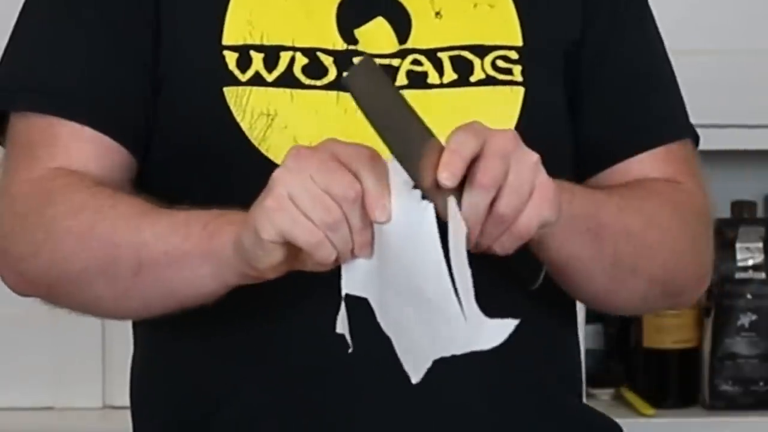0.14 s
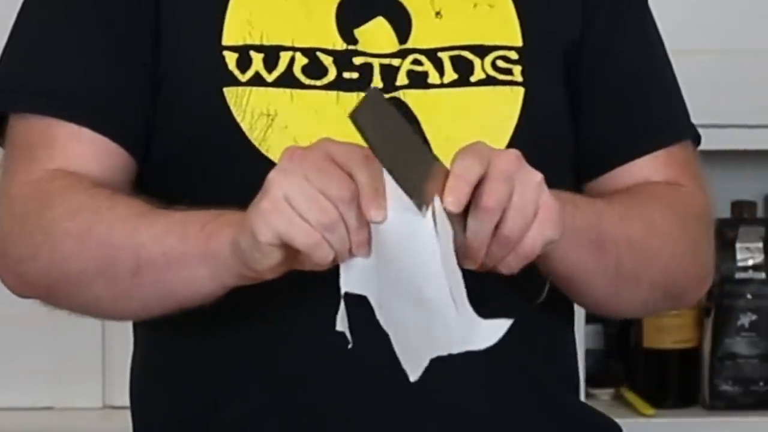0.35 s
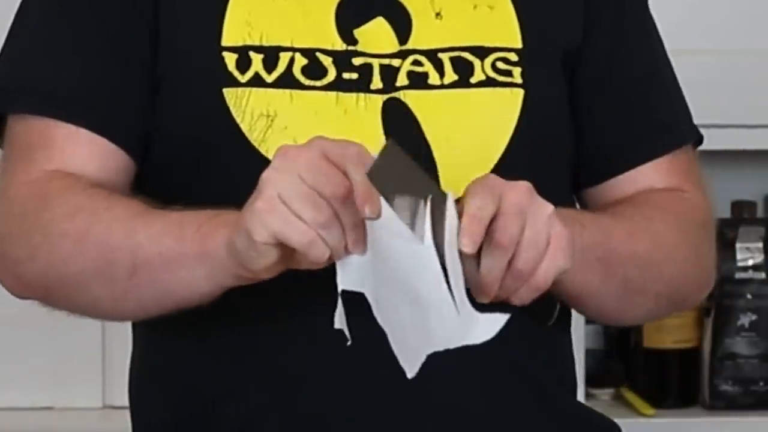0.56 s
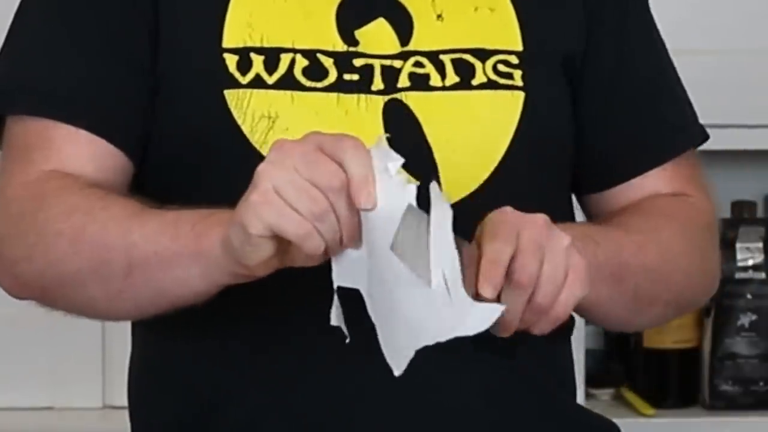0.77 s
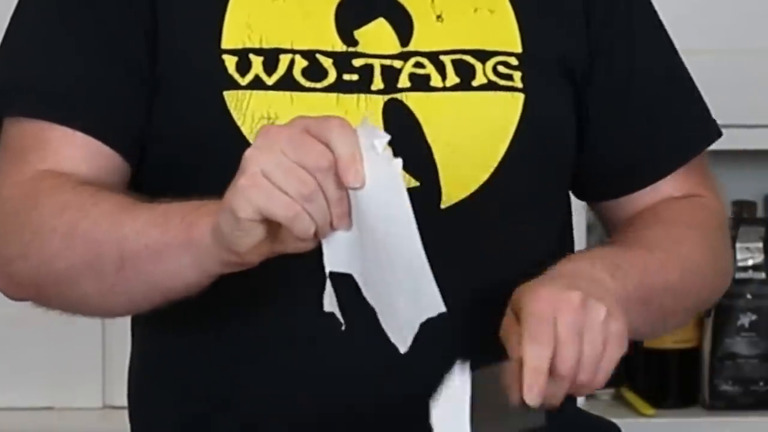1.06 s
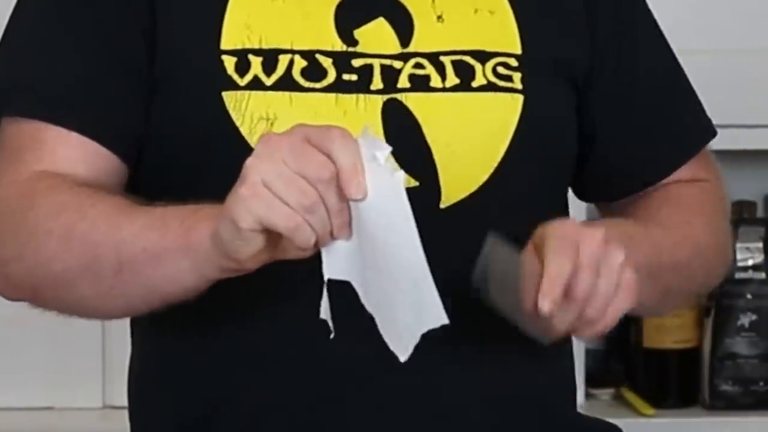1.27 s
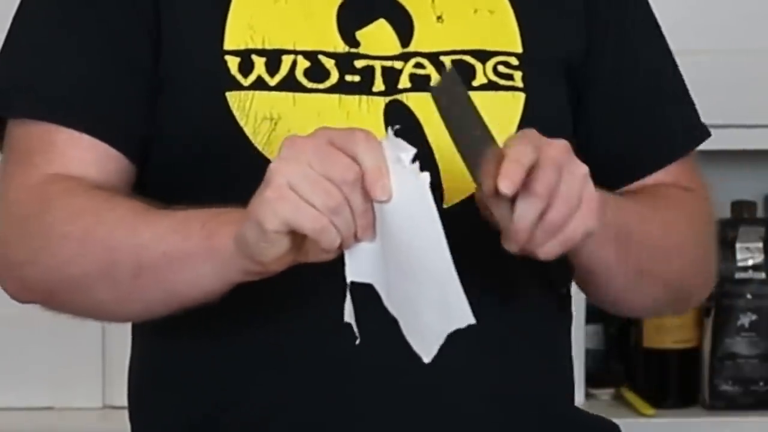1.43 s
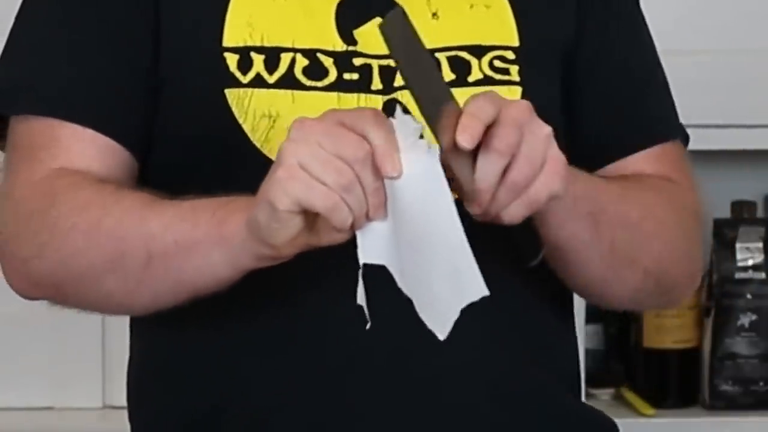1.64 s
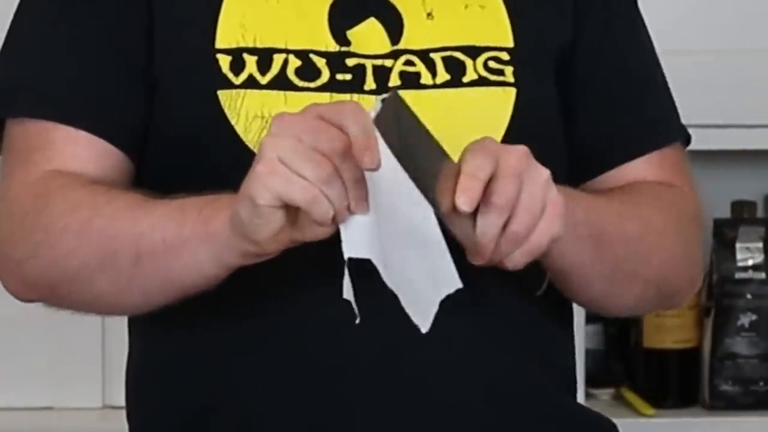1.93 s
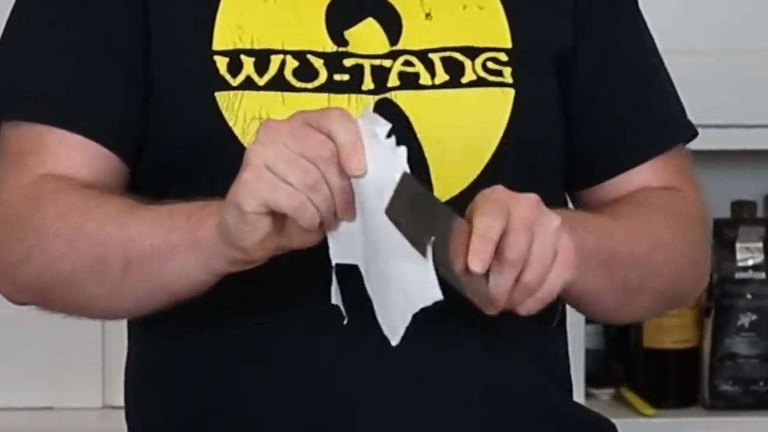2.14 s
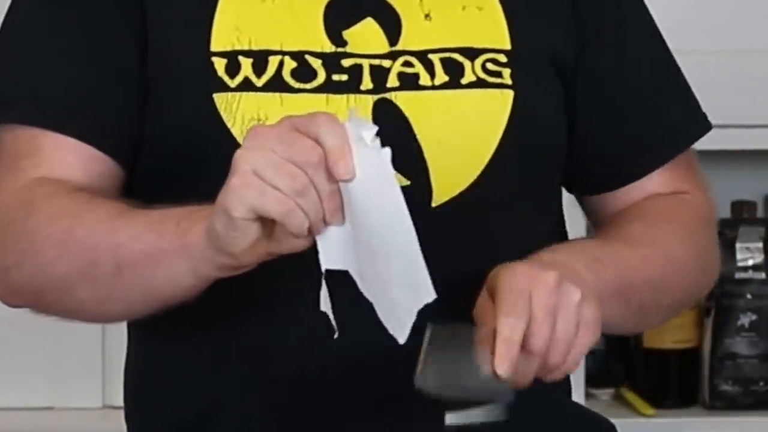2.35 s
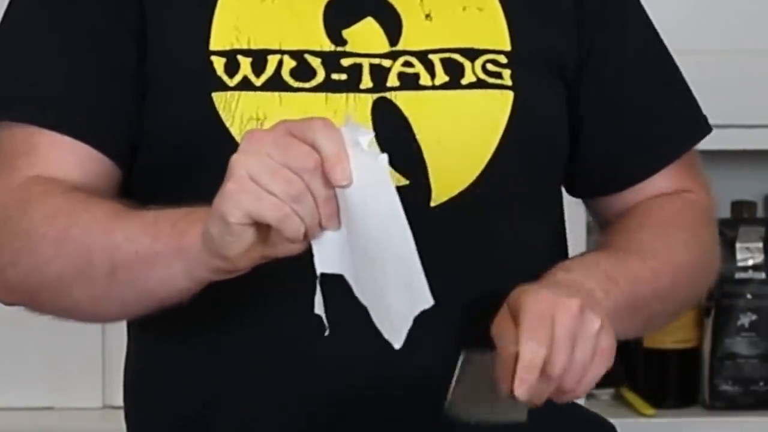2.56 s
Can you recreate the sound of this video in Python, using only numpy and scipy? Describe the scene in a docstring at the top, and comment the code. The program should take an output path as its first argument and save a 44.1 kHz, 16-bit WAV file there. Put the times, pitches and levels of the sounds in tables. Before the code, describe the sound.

A knife slices through a sheet of paper, catching in small snaps before running into a dry rasp. The paper flicks back, and after a pause a second, shorter cut follows. Heard close up in a small kitchen.

```python
"""In a small kitchen, close by, a knife slices twice down through a hand-held sheet of paper.
The edge catches in separate snaps, then runs: fibres break in a dense train of impulses, which the
sheet radiates as a rasp. The paper flicks back after each stroke, the freed blade rings faintly in
its modes, and an arm rustles on its way up again. Hard walls add a short reverberation."""
import sys
import numpy as np
from scipy import signal
from scipy.fft import rfft, irfft
from scipy.io import wavfile
from scipy.ndimage import uniform_filter1d

SR = 44100
rng = np.random.default_rng(int(sys.argv[2]) if len(sys.argv) > 2 else 0)


def store_pcm(level_fs):
    """Save levels as 16-bit WAV."""
    pcm = np.round(np.clip(level_fs, -1, 1) * 32767).astype(np.int16)
    wavfile.write(sys.argv[1], SR, np.atleast_2d(pcm).T)


N = 119070

# frequency response of the sheet (frequency [Hz], level [dB])
SHEET = [(47, -65.5), (80, -23.5), (133, -30), (182, -15.5), (217, -21.5), (283, -16), (338, -8.5),
         (482, -9.5), (643, -3.5), (802, -6), (1120, -1), (1460, -1), (1600, -1), (1900, -4), (2220, -5.5),
         (2660, -2.5), (3620, -5), (4520, -5), (5900, -13.5), (6590, -11), (7360, -16), (8790, -11.5),
         (10700, -24.5), (12800, -24), (16000, -34)]
CONTACT_ATTACK_S, CONTACT_RELEASE_S = 0.006, 0.0074
WANDER_PER_S, TOP_HZ = 16, 15850


def cutting(t, size=131072):
    """Source and filter: breaking fibres drive the sheet, whose resonances wander as it flexes."""
    # each stroke (time [s], level [dB], low mids [dB], treble [dB], main resonance [Hz])
    first_cut = [(0.37, -31, -4, -12, 2800), (0.395, -40.5, 2.5, -0.5, 3030),
                 (0.44, -33.5, -3.5, -4.5, 2840.0), (0.475, -31, -5, -4.5, 2880),
                 (0.505, -28, -5.5, -8.5, 3100), (0.55, -29.5, -3, -12.5, 2680),
                 (0.595, -27.5, -3, -11.5, 2530), (0.615, -30, -1, -10.5, 2640),
                 (0.65, -30, -3.5, -11.5, 2760), (0.75, -35, -1, -6, 2580), (0.79, -30, -1.5, -11, 2440),
                 (0.825, -35.5, 1.5, -6.5, 2640), (0.91, -36.5, 1, -8, 2480), (0.95, -32.5, -1.5, -8, 3020),
                 (0.98, -35.5, -1.5, -3.5, 2830), (1.005, -36.0, -3.5, 2.5, 3400),
                 (1.02, -31, -7, -17, 3270)]
    second_cut = [(1.87, -53.5, 4.5, -9, 2740), (1.9, -47.5, 8, -13.5, 2850), (1.96, -42, 0, -13, 2950),
                  (2.03, -41.5, 3.5, -11.5, 2800), (2.08, -43.5, 5.5, -8.5, 2940.0),
                  (2.14, -36, -5.5, -11, 2750), (2.21, -33.5, -5, -8.5, 2800), (2.25, -31.5, -1, -8, 2940),
                  (2.295, -31.0, -2.5, -7, 2570), (2.335, -28.5, -4, -6, 2570), (2.35, -30.5, 3, -9, 2680)]
    # modes beside the cut (ratio to the main resonance, bandwidth [Hz], gain [dB])
    resonances = [(.53,160,-5.5),(1,320,-2),(1.72,420,-1),(3.2,600,5)]
    # bands of the rasp (lower edge [Hz], upper edge [Hz], gain [dB], low-mid share, treble share)
    registers = [(626,1996,-2,0.84,0.024),(2010,3580,-0.8,0.039,0),(3934,6520,.5,0,0.41),(6670,9940,-0.5,0.26,1.28),(10100,16500,-6.5,0.23,1.42)]
    # bending of the sheet, one curve per movement (time [s], level [dB])
    bending = [
        [(.05,-54),(.09,-54),(.15,-49),(.18,-68)],
        [(.2,-57),(.36,-50.5),(.52,-45.5),(.6,-51),(.7,-48),(.8,-43),(.88,-50),(1.01,-46),(1.09,-59),(1.12,-78)],
        [(1.87,-54.5),(1.93,-45.5),(2.04,-40),(2.12,-48.5),(2.24,-42),(2.28,-54),(2.345,-42),(2.4,-60)],
    ]
    # the edge scrapes without biting (time [s], duration [s], level [dB])
    scrapes = [(0.044, 0.062, -47), (0.125, 0.027, -52), (0.179, 0.035, -56), (0.237, 0.062, -43),
               (0.304, 0.035, -37), (1.041, 0.054, -46), (2.386, 0.087, -55)]
    hz, out = freqs(size), np.zeros(N)
    times, *columns = np.vstack([first_cut, second_cut]).T
    level_db, low_db, treble_db, main_hz = (np.interp(t, times, c) for c in columns)
    drive = shape(fibres(), contour(SHEET, hz))
    rasp = drive.copy()
    for ratio, width, db in resonances:
        mode_hz = ratio * main_hz * (1 + 0.11 * walk(WANDER_PER_S))
        rasp += undb(db) * resonate(drive, mode_hz, width)
    spectrum = rfft(rasp, size)
    register = lambda lo, hi: unit(irfft(spectrum * band(hz, lo, hi) ** 2)[:N])
    in_paper = sum(contact(t, cut[0][0], cut[-1][0]) for cut in (first_cut, second_cut))
    for lo, hi, db, low_share, treble_share in registers:
        band_db = level_db + db + low_share * low_db + treble_share * treble_db
        out += register(lo, hi) * in_paper * undb(band_db)
    bass = register(130, 634)
    for movement in bending:
        out += bass * undb(-3.5 + 3 * walk(per_s=35)) * gesture(t, movement)
    for at, duration, db in scrapes:
        out += unit(rasp) * undb(db) * contact(t, at + CONTACT_ATTACK_S / 2, at + duration)
    return out


def fibres(breaks_per_s=9000, spread_db=1.5, grab_db=1.05):
    """Shot noise: fibres break at random, harder and softer as the edge sticks and slips."""
    breaks = rng.random(N) < breaks_per_s / SR
    strength_db = spread_db * np.minimum(rng.exponential(size=N), 6) + grab_db * walk(per_s=170)
    return breaks * undb(strength_db) * rng.choice([-1, 1], N)


def sizzle(t):
    """Forced resonance: driven by the breaks, narrow modes of the taut paper swell and drop."""
    # (peak time [s], rise [s], fall [s], level [dB], frequency [Hz], bandwidth per stage [Hz])
    sizzles = [(.505,0.055,0.017,-35.5,6280,900),(.66,0.16,0.037,-39,1465,297),(.97,0.09,0.027,-48.5,13000,1800),(2.3,.04,0.024,-41,12100,1300),(2.334,0.042,0.009,-33.5,4980,1000)]
    breaks, out = fibres(), np.zeros(N)
    for at, rise, fall, db, pitch, width in sizzles:
        hz = pitch * (1 + 0.018 * walk(WANDER_PER_S))
        swell = np.exp(-((t - at) / np.where(t < at, rise, fall)) ** 2)
        singing = resonate(resonate(breaks, hz, width), hz, width)
        out += undb(db) * swell * unit(singing)
    return out


def paper_clicks(size=2048):
    """Impulsive excitation: fracture, buckling and impact each radiate a brief transient."""
    # the edge catches and a bundle of fibres snaps (time [s], level [dB], tilt [dB/octave])
    snaps = [(0.0488,-44,2),(.0978,-40.5,-1.5),(0.1361,-40.5,3),(0.1934,-36,-2.5),(0.2078,-32,0.5),(.2303,-35.5,0.5),(0.2414,-42.5,9.5),(0.246,-34.5,9),(.2565,-32.5,-0.5),
             (0.2744,-40.5,7),(0.2795,-30,3),(0.2847,-26.5,2),(.2899,-40,0.5),(0.3064,-26,4.5),(0.31,-36,6.5),(0.3138,-34,7),(0.3181,-22,9.5),(0.3265,-29,7.5),(.329,-22.5,-1.5),
             (0.334,-33,-1),(0.341,-28.5,6),(0.3428,-22,-1),(0.359,-19,2.5),(0.3616,-26.5,2.5),(0.3647,-24.5,1),(.375,-37,1),(1.002,-29.5,-3),(1.177,-43,4.5),(1.365,-50.5,7.5),(2.173,-27.5,-8)]
    # the sheet buckles or flicks back (time [s], level [dB], frequency [Hz], relative air puff [dB])
    flicks = [(.199,-28.5,1940,-9.5),(0.795,-26,1140,-9.5),(1.014,-29.5,2330,-6),(1.082,-28,1770,-10.5),(1.247,-59.5,900,3),(1.754,-59,2000,-8),(2.0124,-27,1830,-13),(2.246,-24,1220,-15),(2.347,-23.5,1020,-13),(2.426,-28,1470,-6.5),(2.4327,-23,2400,-23)]
    # the cut strip lands (time [s], level [dB], frequency [Hz], decay [s])
    ticks = [(1.294,-41,6500,0.0017),(1.3024,-45,7600,0.00069),(1.3039,-38,7000,0.00075),(1.318,-52,5540,.001),(1.324,-42,7000,0.0013),(1.327,-45.5,5130,0.0008)]
    hz, t, out = freqs(size), np.arange(size) / SR, np.zeros(N)
    sheet = contour(SHEET, hz)
    for at, db, tilt in snaps:
        colour = sheet * undb(tilt * np.log2(hz)) * band(hz, 775, TOP_HZ, order=2)
        add(out, at, undb(db) * burst(colour, decay_s=0.0018))
    for at, db, pitch, puff_db in flicks:
        crack = burst(sheet * hump(hz, pitch, octaves=0.53), decay_s=0.0023)
        puff = burst(hump(hz, 356, octaves=1.65) ** 2, decay_s=0.0076)
        add(out, at, undb(db) * (crack + undb(puff_db) * puff))
    for at, db, pitch, decay in ticks:
        envelope = (t / decay) * np.exp(2 - 2 * t / decay)
        ping = envelope * np.sin(2 * np.pi * pitch * t)
        crack = burst(hump(hz, pitch, octaves=0.5), decay)
        add(out, at, undb(db) * (ping + undb(-7.5) * crack))
    return out


def blade(t):
    """Free vibration: the steel rings in damped modes when it leaves the paper."""
    # blade modes (frequency [Hz], level [dB], T60 [s])
    modes = [(2080,-37.5,0.35),(2132,-48.5,0.3),(2970,-44.5,0.43),(4560,-64,0.21),(7600,-56.5,0.66)]
    # the blade comes free (time [s], gain [dB])
    releases = [(1.02,-5),(2.432,-4.5)]
    ring = sum(undb(db) * np.sin(2 * np.pi * hz * t) * undb(-60 * t / t60) for hz, db, t60 in modes)
    out = np.zeros(N)
    for at, db in releases:
        add(out, at, undb(db) * ring)
    return out


def sleeve(t):
    """Friction noise: cloth rustles as the knife arm moves."""
    # spectrum of the rustle (frequency [Hz], level [dB])
    cloth = [(47, -16), (80, -10), (208, -6), (253, -26), (283, -11), (802, -12), (1670, -21),
             (1950, -15.5), (3870, -19), (16000, -32)]
    # one curve per arm movement (time [s], level [dB])
    arm = [
        [(1.15,-60.5),(1.38,-67.5),(1.5,-64),(1.63,-62.5),(1.72,-71),(1.8,-92)],
        [(2.5,-56),(2.62,-73),(2.7,-70)],
    ]
    return coloured_noise(cloth) * undb(walk(per_s=30.2)) * sum(gesture(t, move) for move in arm)


def still_air(level_db=-63.5):
    """Ambient noise: a steady hush, strongest in the bass."""
    # spectrum of the kitchen's air (frequency [Hz], level [dB])
    air = [(15, -29.5), (25, -11.5), (270, -6), (624, -19), (911, -17), (1330, -24), (2690, -26.5),
           (5430, -32), (7710, -32), (8830, -33), (16000, -41)]
    return undb(level_db) * coloured_noise(air)


def kitchen(x, delay_s=0.00506, size=32768):
    """Reverberation: reflections from walls and cupboards form a diffuse, exponential tail."""
    # decay by band (frequency [Hz], T60 [s], level [dB])
    room = [(200,0.22,-6.5),(590,0.47,-6.5),(1420,0.35,-6.5),(3950,0.48,-12),(9000,0.33,-6.5),(15000,0.22,-6)]
    t, hz, noise = np.arange(size) / SR, freqs(size), rfft(rng.standard_normal(size))
    log_centres, tail = np.log([row[0] for row in room]), 0
    for pick, (_, t60, db) in zip(np.eye(len(room)), room):
        reflections = irfft(noise * np.interp(np.log(hz), log_centres, pick))
        fade = undb(-60 * t / t60) * (t > delay_s)
        tail += undb(db) * reflections * fade / np.sqrt(np.sum(fade ** 2))
    return x + signal.fftconvolve(x, tail)[:N]


def contact(t, start, end):
    """Gate with a linear attack and an exponential release."""
    attack = np.clip((t - start) / CONTACT_ATTACK_S + 1, 0, 1)
    return attack * np.exp(-np.maximum(t - end, 0) / CONTACT_RELEASE_S)


def gesture(t, curve):
    """Envelope from a (time [s], level [dB]) curve, fading out beyond its ends."""
    times, db = np.array(curve).T
    return undb(np.interp(t, times, db)) * contact(t, times[0], times[-1])


def burst(gain, decay_s, rise_s=0.0004, size=2048):
    """Damped noise transient with the energy of 2 ms (88 samples) at rms 1."""
    t = np.arange(size) / SR
    envelope = (1 - np.exp(-t / rise_s)) * np.exp(-t / decay_s)
    x = shape(rng.choice([-1., 1.], size) * envelope, gain)
    return x * np.sqrt(88 / np.sum(x ** 2))


def resonate(x, hz, width):
    """Resonator with a moving centre frequency and gain 1 at the centre."""
    turn = np.exp(2j * np.pi * np.cumsum(hz) / SR)
    pole = np.exp(-np.pi * width / SR)
    return 2 * np.real(turn * signal.lfilter([1 - pole], [1, -pole], x / turn))


def coloured_noise(points):
    """Gaussian noise filtered to a spectral outline, at rms 1."""
    return unit(shape(rng.standard_normal(N), contour(points, freqs(131072))))


def shape(x, gain):
    """Minimum-phase filter from a gain per bin, scaled to a peak of 1."""
    size = 2 * (len(gain) - 1)
    cepstrum = irfft(np.log(gain / gain.max() + 1e-5))
    cepstrum[1:size // 2] *= 2
    cepstrum[size // 2 + 1:] = 0
    return irfft(rfft(x, size) * np.exp(rfft(cepstrum)))[:len(x)]


def contour(points, hz):
    """Gain of a (frequency [Hz], level [dB]) outline."""
    f, db = np.array(points).T
    return undb(np.interp(np.log(hz), np.log(f), db))


def band(hz, lo, hi, order=10):
    """Gain of a band-pass filter."""
    return 1 / np.sqrt((1 + (lo / hz) ** (2 * order)) * (1 + (hz / hi) ** (2 * order)))


def hump(hz, centre, octaves):
    """Gain of a broad resonance."""
    return 1 / (1 + (np.log2(hz / centre) / octaves) ** 2)


def walk(per_s):
    """Smooth random modulation at rms 1."""
    hold = max(int(SR / per_s), 1)
    steps = rng.standard_normal(N)[np.arange(N) // hold]
    return unit(uniform_filter1d(steps, hold))


def add(out, at, x):
    """Superpose a sound at a time."""
    i = max(int(at * SR), 0)
    out[i:i + len(x)] += x[:max(N - i, 0)]


def freqs(size):
    """Frequencies of a spectrum's bins."""
    return np.maximum(np.arange(size // 2 + 1) * SR / size, 1)


def undb(db):
    """Decibels to gain."""
    return 10 ** (np.asarray(db) / 20)


def unit(x):
    """Scale to rms 1."""
    return x / np.sqrt(np.mean(x ** 2) + 1e-20)


def scene():
    """Superposition: the paper and its reverberation sum with blade, air and sleeve."""
    t = np.arange(N) / SR
    paper = cutting(t) + sizzle(t) + paper_clicks()
    return (kitchen(paper) + blade(t) + still_air() + sleeve(t))[None]


def record(dry):
    """Band limiting: a gentle high-pass thins the deepest bass and a steep low-pass cuts the top."""
    thin = signal.sosfilt(signal.butter(1, 35, "high", fs=SR, output="sos"), dry)
    return signal.sosfilt(signal.ellip(10, .2, 80, TOP_HZ, fs=SR, output="sos"), thin)


dry = scene()
out = record(dry)
store_pcm(out)
```